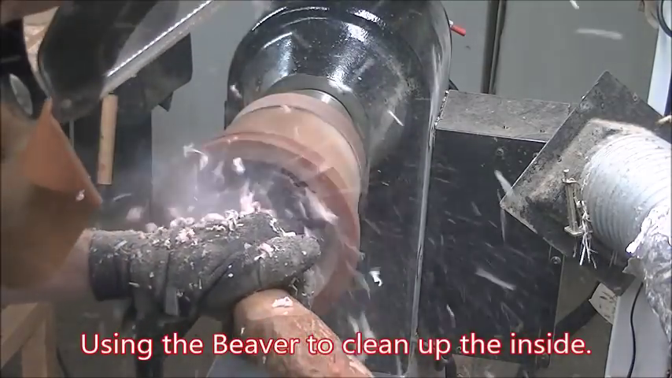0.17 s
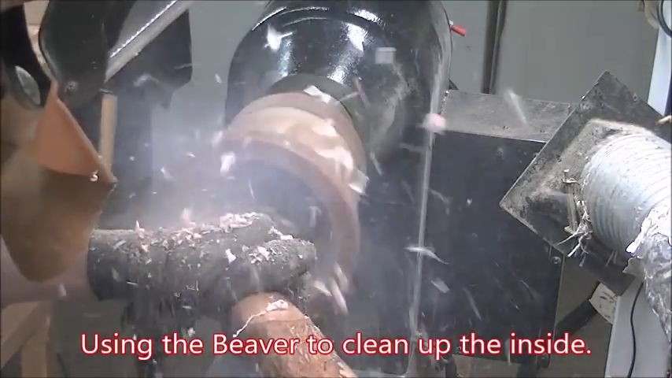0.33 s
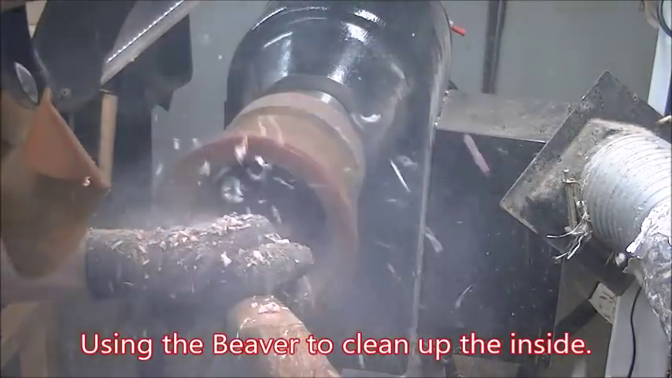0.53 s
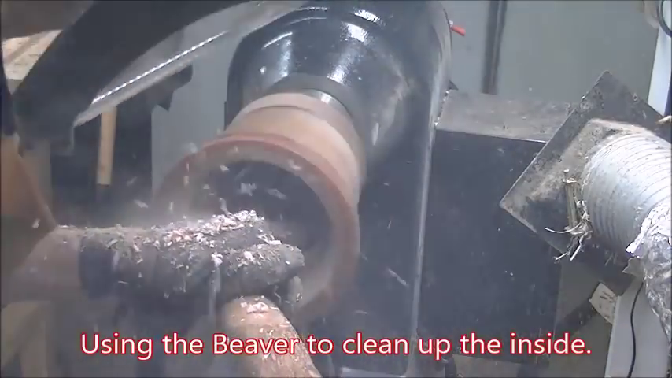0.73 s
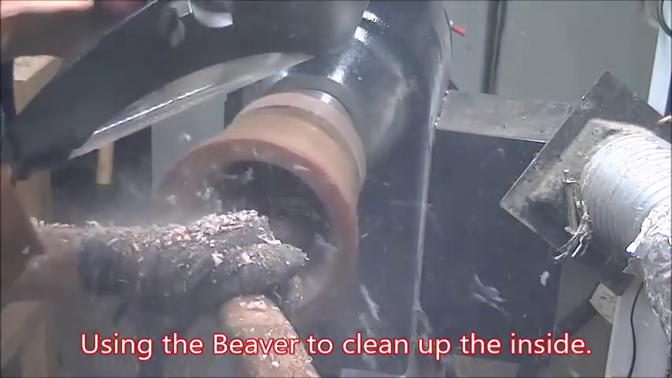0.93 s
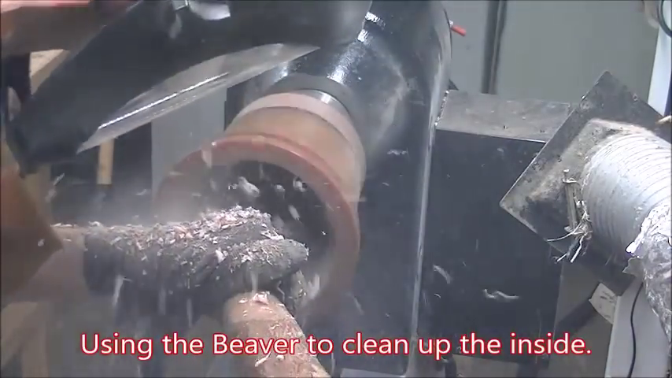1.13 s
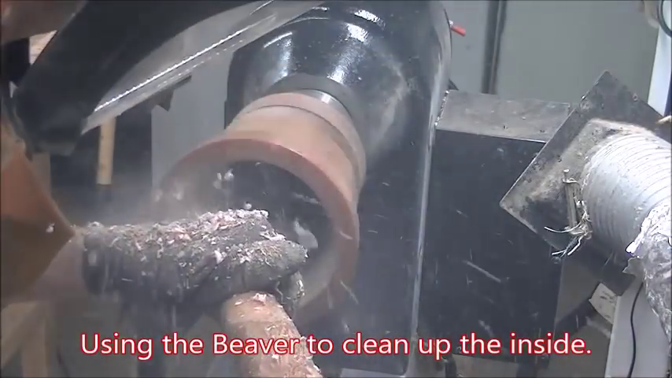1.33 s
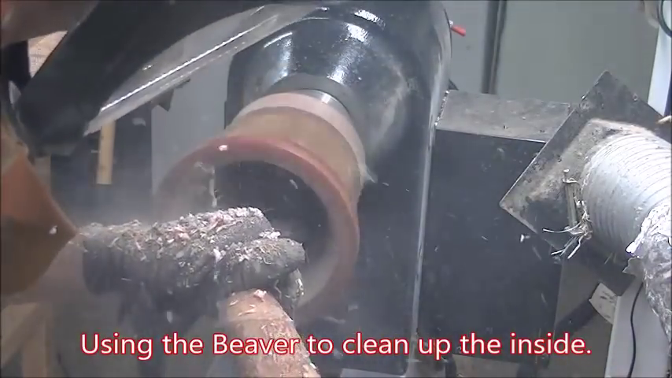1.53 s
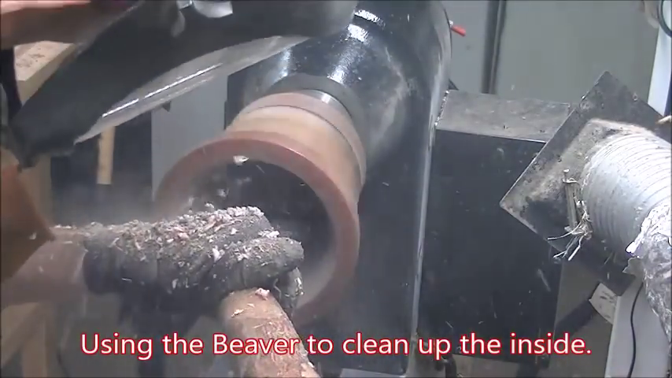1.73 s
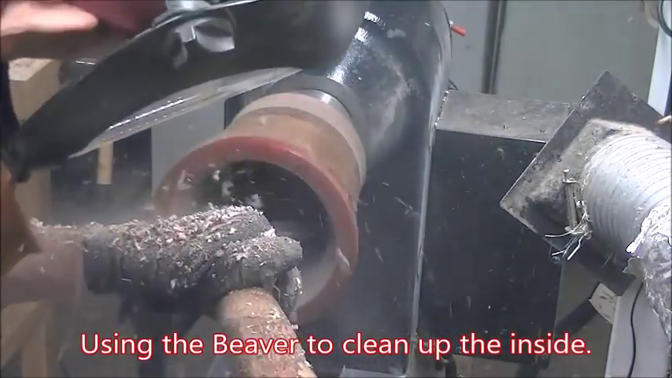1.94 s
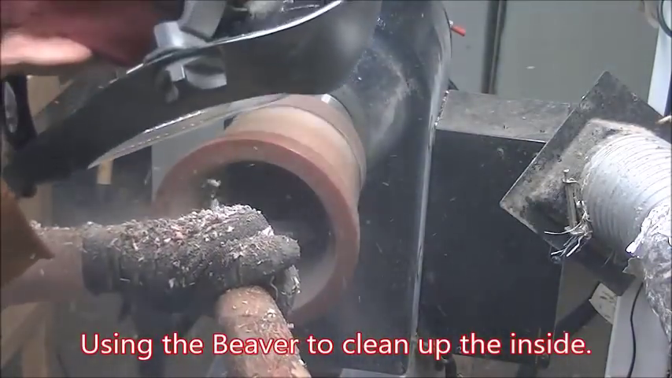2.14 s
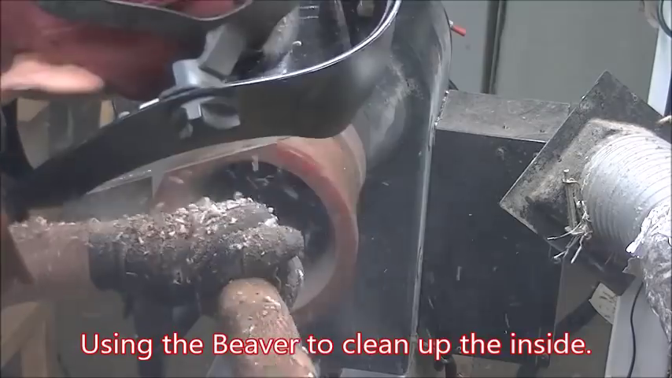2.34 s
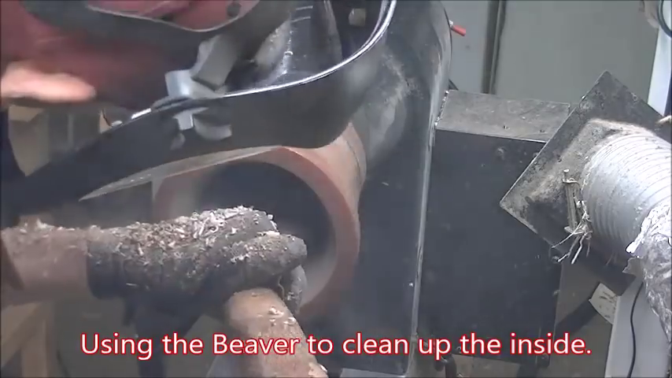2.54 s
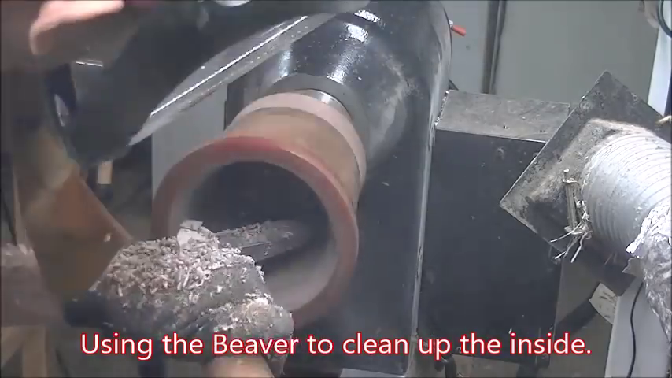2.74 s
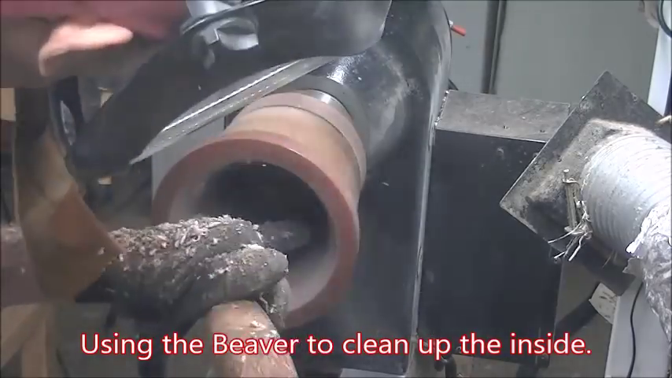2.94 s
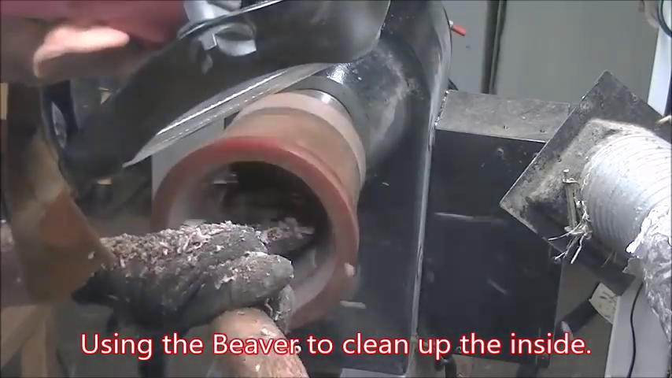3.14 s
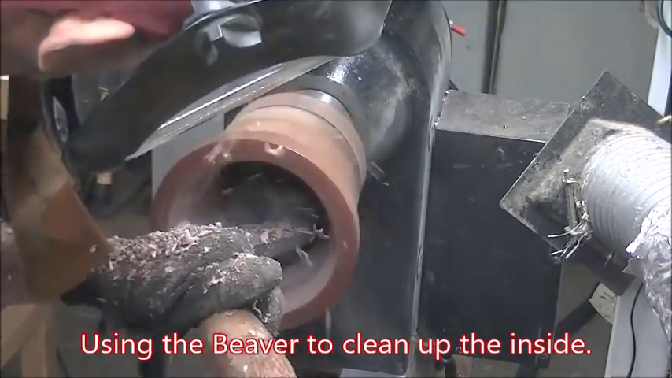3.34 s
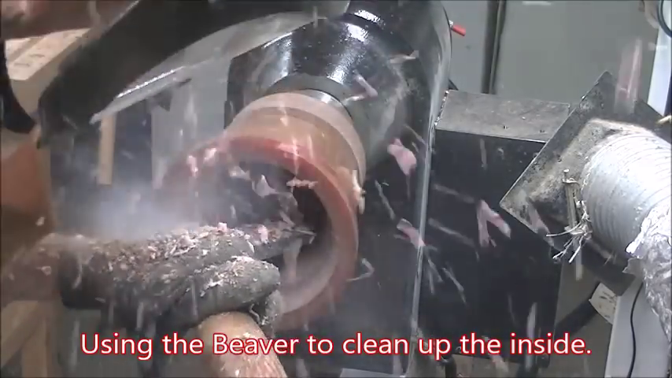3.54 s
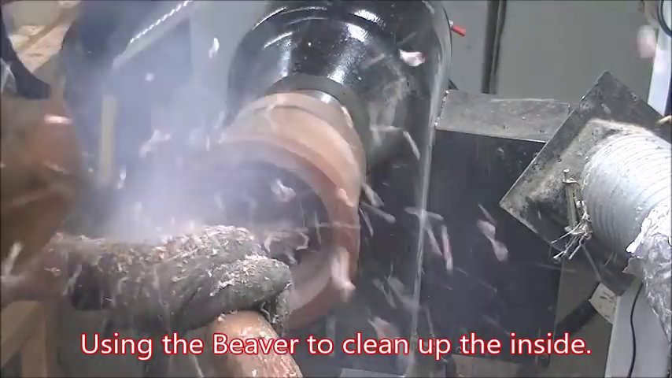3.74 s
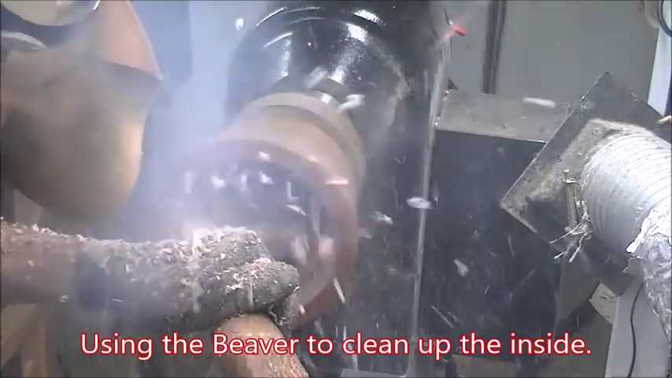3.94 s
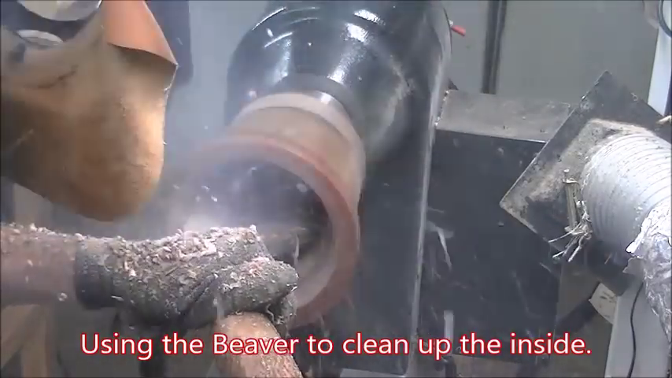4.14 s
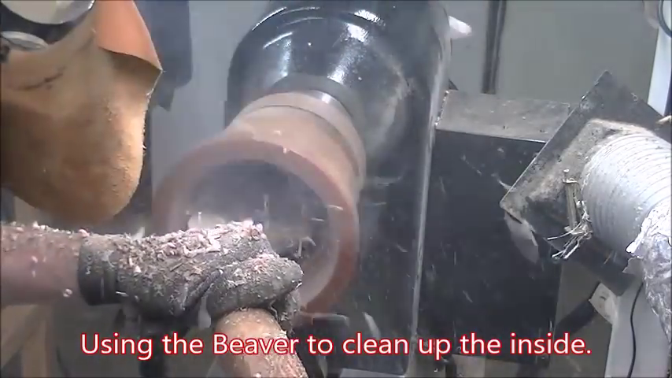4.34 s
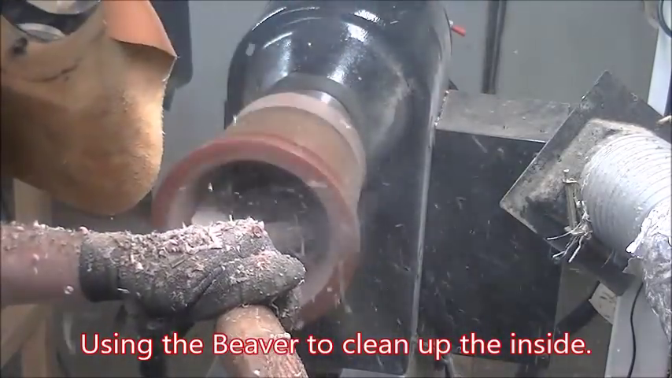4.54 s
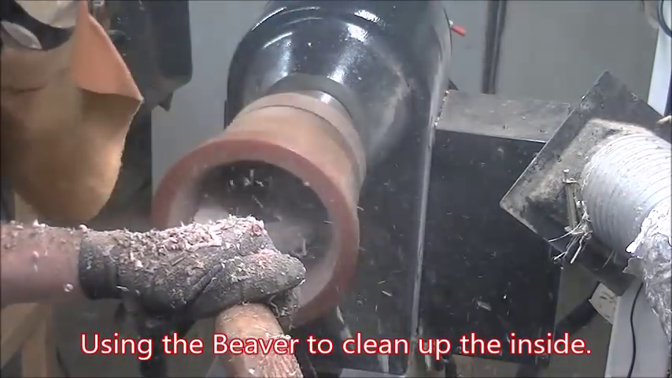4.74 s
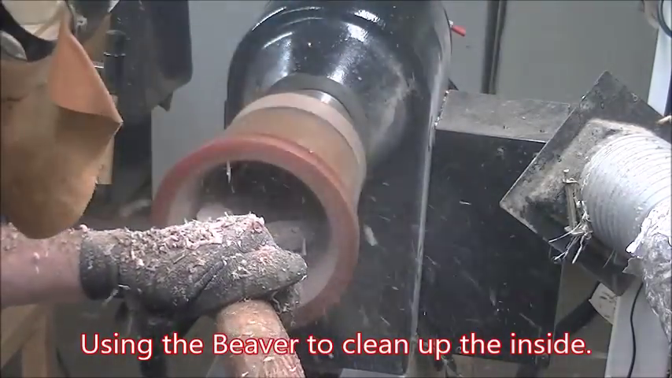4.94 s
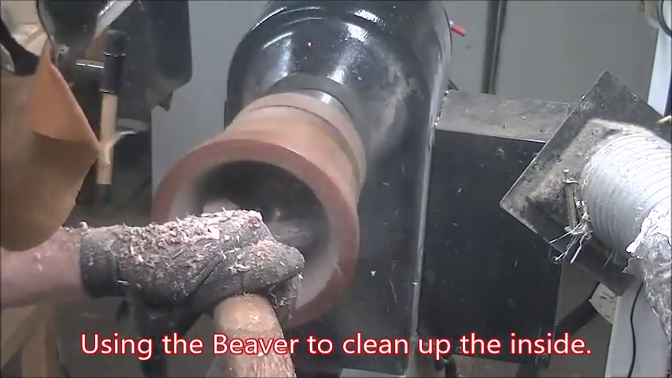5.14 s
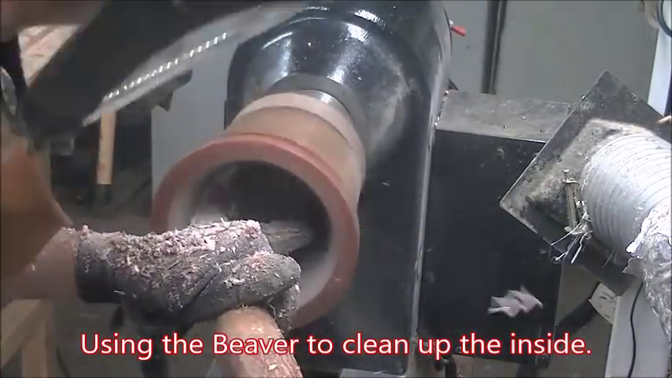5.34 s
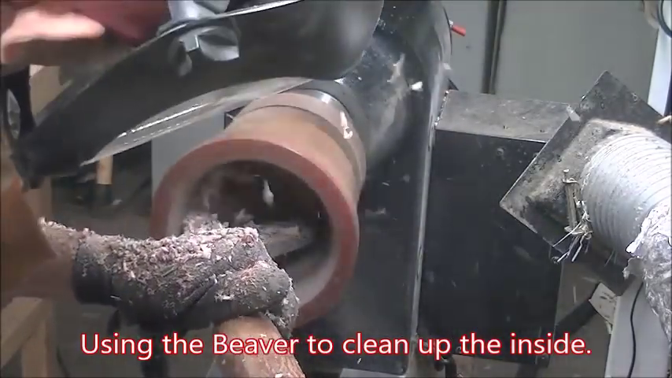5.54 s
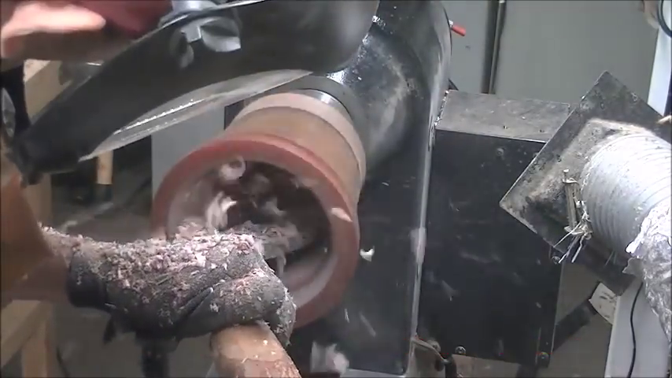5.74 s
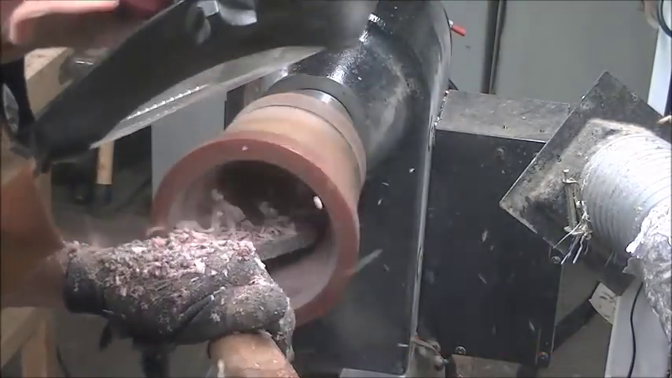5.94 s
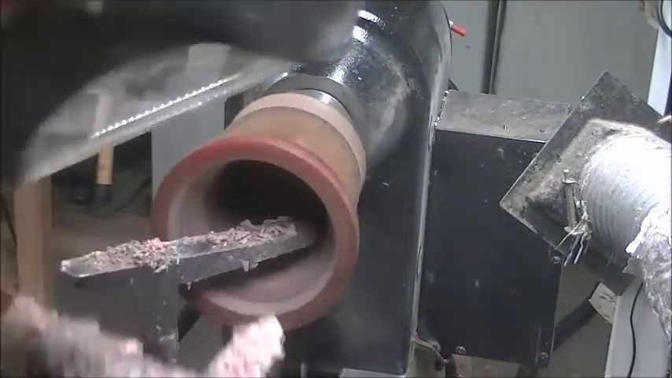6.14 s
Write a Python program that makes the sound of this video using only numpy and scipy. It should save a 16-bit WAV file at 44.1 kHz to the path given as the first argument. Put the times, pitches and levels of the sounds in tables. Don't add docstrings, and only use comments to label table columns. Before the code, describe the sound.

A hand-held tool scrapes loudly inside a spinning wooden bowl, hissing, ringing and squealing, with sharp ticks in two short pauses, over faint workshop machinery.

```python
import sys
import numpy as np
from scipy import signal
from scipy.fft import rfft, irfft, next_fast_len
from scipy.io import wavfile
from scipy.ndimage import uniform_filter1d, map_coordinates

SR = 44100
rng = np.random.default_rng(int(sys.argv[2]) if len(sys.argv) > 2 else 0)


def ratio(d):
    e = np.asarray(d, float) / 20
    return 10 ** e


def dump_mix(stems):
    frames = np.atleast_2d(stems).T
    limited = np.clip(frames, -1, 1)
    pcm = np.round(limited * 32767).astype(np.int16)
    wavfile.write(sys.argv[1], SR, pcm)


N = 273420
FRAME, OVERLAP = 1024, 768

# t/s, turns per second/Hz
SPIN = [(0, 66.5), (.4, 66.8), (.6, 67.13), (2.4, 67.2), (2.7, 68.2), (2.95, 67.4), (3.03, 66.8),
        (3.25, 66.8), (3.33, 67.4), (3.6, 67.3), (3.8, 67.05), (4.2, 67.15), (4.5, 67.4), (5.4, 67.4),
        (5.55, 66.5), (5.95, 66.35), (6.1, 67.8), (6.2, 68)]
# f/Hz, level/dB
SHAVING = [(2240, -31), (3800, -15.5), (4110, -15), (4500, -12), (5980, -2), (6660, -4), (7730, -3.5),
           (9020, -4.5), (10700, -6), (11600, -7.5), (13200, -7.5), (14500, -9.5), (15800, -5.5)]
# f/Hz, level/dB
WALL = [(1060, -29), (1800, -3.5), (1990, -2.5), (2360, -4.5), (2880, -1), (3560, -1.5), (4200, -4),
        (5460, -20), (9240, -120)]
# f/Hz, width/Hz, level/dB, extra at full overhang/dB
STEEL = [(5310, 130, -16, 13), (5520, 130, -14, 13), (5770, 150, -9, 12), (6100, 170, 0, -1),
         (6790, 110, -10, 0), (7070, 120, -8, -2), (7600, 200, -12, 2), (8350, 160, -10, 3),
         (9400, 200, -8, 2)]
# f/Hz, width/Hz, level/dB
RIM = [(1140, 60, -9), (1345, 90, -4), (1610, 50, 1), (1710, 120, -3)]
# t/s, length/s, gain/dB
HUMS = [
    (.22, 0.044, 8),
    (.56, .05, 8),
    (1.02, 0.66, 8.5),
    (1.84, .56, 8),
    (3.9, 0.047, 7),
    (4.78, .07, 6),
    (4.33, 0.36, 4),
    (4.93, 0.26, 9.5),
]
# t/s, length/s, gain/dB
FLICKERS = [(.18, .14, 4), (.52, .38, 5), (.94, .06, 5), (1.05, .13, 5), (1.26, .09, 6), (1.41, .07, 6),
            (1.51, .19, 5), (1.71, .19, 5), (1.96, .4, 4), (3.71, .35, 4), (4.12, .18, 4), (4.45, .3, 3),
            (4.93, .22, 4), (5.36, .2, 3)]


def cutting():
    turns = np.cumsum(curves(SPIN, np.arange(N) / SR)[0]) / SR
    tear, push = teeth(turns)
    f, t, _ = signal.stft(tear, SR, nperseg=FRAME, noverlap=OVERLAP)
    f = f[:, None]
    hiss_db, shank_db, shank_hz, tip_db, tip_hz, cavity_db, rim_db, wall_db, squeal_db = handling(t)
    reach = curves(REACH, t)[0]
    steel_power = sum(ratio(db + more_db * reach) ** 2 * np.abs(mode(f, hz, width)) ** 2
                      for hz, width, db, more_db in STEEL)
    steel = np.sqrt(steel_power)
    rim = sum((-1) ** k * ratio(db) * mode(f, hz, width) for k, (hz, width, db) in enumerate(RIM))
    wall = ratio(along(WALL, f))
    chip_fizz = mode(f, 11450, 900) ** 2 + .7 * mode(f, 14100, 900) ** 2
    colour = echoes(f, t)
    edge = shaped(tear, [(hiss_db + 4.5, ratio(along(SHAVING, f))),
                         (hiss_db + shank_db + 0.5, mode(f, shank_hz, 850) ** 2 + 4.3 * steel),
                         (hiss_db + tip_db - 1.5, mode(f, tip_hz, 640) ** 2),
                         (hiss_db - 7, chip_fizz),
                         (wall_db - 1.0, wall),
                         (squeal_db[1] - 1, mode(f, 3568, 290) ** 2)], colour)
    hum = shaped(push, [(cavity_db - 1.5, mode(f, 868, 75) ** 3),
                        (rim_db - 15.5 + spells(HUMS, t)[0], mode(f, 1076, 26) ** 2),
                        (rim_db - 6 + spells(FLICKERS, t)[0], rim * mode(f, 1390, 960)),
                        (wall_db - 6.0, wall),
                        (squeal_db[0] - 8, mode(f, 3535, 60) ** 3)], colour)
    return edge + hum + chatter(turns)


WANDER_TURNS = .0008
LATHE_HZ = 11.2
# t/s, repeating share/0-1, tooth unevenness/dB
BITE = [(0, 0.23, 2), (.6, 0.7, -1.5), (1.2, 0.33, 0.5), (1.8, 0.64, 3), (2.4, 0.4, 1), (3, 0.2, 2),
        (3.6, 0.07, 2), (4.1, 0.24, 0.5), (4.7, 0.52, 1.5), (5.2, 0.15, 1), (5.6, 0.58, 3), (6, 0, 4)]


def teeth(turns):
    t = np.arange(N) / SR
    share, uneven_db = curves(BITE, t)
    share = np.clip(share, 0, 1)
    grain = per_turn(turns + WANDER_TURNS * wobble(30), memory=.88, smooth=1)
    tear = np.sqrt(share) * grain + np.sqrt(1 - share) * rng.standard_normal(N)
    bunch = np.clip(uneven_db, 0, 9) * per_turn(turns, memory=0.876, smooth=71)
    rock = (0.22 + 0.59 * wobble(2.0)) * np.sin(2 * np.pi * LATHE_HZ * t)
    proud = 2.6 * np.cos(np.pi * turns) ** 12
    splinters = 1.42 * wobble(1500) + 0.53 * wobble(16)
    tear = tear * ratio(bunch + proud + splinters + rock)
    tear = tear / np.sqrt(np.abs(uniform_filter1d(tear ** 2, size=9000)))

    push = sum(ratio(2.4 * drift(7)) * np.sin(2 * np.pi * (k * turns + rng.random() + .07 * drift(12)))
               for k in range(11, 57))
    push = unit(push) + 1.5 * rng.standard_normal(N)
    return tear, push / 2.224


def per_turn(turns, memory, smooth):
    size, finer = 656, 4
    last = int(turns[-1])
    fresh = rng.standard_normal((last + 30, size))
    fresh = uniform_filter1d(fresh, smooth, axis=1, mode="wrap")
    ring = signal.lfilter([1], [1, -memory], fresh, axis=0)[-last - 2:].ravel()
    fine = signal.resample_poly(ring, up=finer, down=1)
    return unit(np.interp(turns * size * finer, np.arange(len(fine)), fine))


# t/s, hiss level/dB
PRESSURE = [(0, -24.5), (.06, -27), (.14, -22.5), (2.38, -22.5), (2.49, -29), (2.62, -37), (2.92, -46),
            (3.01, -24), (3.25, -28), (3.28, -32.5), (3.48, -22), (4.3, -23), (5.13, -23), (5.22, -28),
            (5.44, -23), (5.97, -26), (6.04, -40.5), (6.2, -43)]
# t/s, length/s, gain/dB
LEANS = [(.08, .04, 1), (1.44, 0.049, 1), (1.8, 0.025, -2), (2.76, 0.099, -4.5), (3.12, .04, -1.5),
         (3.255, 0.068, -2.5), (2.42, 0.067, 0), (2.58, 0.096, -1), (3.0, 0.011, -1), (3.33, 0.096, 0.5),
         (3.44, 0.073, -1.5), (4.12, 0.14, -0.5), (5.135, .05, 1), (5.96, 0.037, 2)]
# t/s, overhang/0 short to 1 long, freedom to ring/dB
REACH = [(0, 0.052, -1.5), (.35, 0.15, -1.5), (.7, 0.2, -1), (1.3, 0.48, 2.5), (2.0, 0.63, 1.5),
         (2.4, 0.84, -3.5), (2.92, 0.53, -1.5), (3.0, 0.11, -2.5), (3.9, 0.22, 0.5), (4.4, 0.53, 0),
         (5.1, 0.99, 1), (5.2, 0.43, -3.5), (5.38, 1, 1.5), (5.5, 0.49, 3.5), (5.95, 0.031, -1.5),
         (6.08, 0.69, -5)]
# t/s, length/s, cavity/dB, rim/dB, wall/dB
RUBS = [(-.05, 0.34, 6, 2, 1.5), (.34, 0.078, -9.5, 2.5, 0.5), (.715, 0.062, -22.5, -1.5, 1.5),
        (1.755, .015, -16, 0, 1), (2.24, .03, -13, -0.5, 0.5), (1.5, .15, 2, 0, 0),
        (1.435, 0.017, -17, -1, 1), (1.67, 0.014, -11, -8, -4), (3.635, 0.033, -22, -1, -1.5),
        (3.72, 0.029, -22, 0, 1), (3.795, 0.039, -18.5, 3, 2.5), (5.19, 0.05, -25, 4.5, -5),
        (5.575, 0.023, -14, 1, 4.5), (5.805, 0.021, 3, -14, 5.5), (2.05, 0.25, -1, -1.5, -1.5),
        (2.3, 0.09, 2, -2, 1.5), (2.38, 0.091, -1.5, 1.5, 6), (2.98, 0.15, 10.5, 7, 1),
        (3.13, 0.16, 15, 10.5, 4.5), (3.3, 0.15, 12, 1, 0), (3.43, 0.29, 0, -4.5, 0),
        (3.58, 0.2, -3.5, 3.5, 2.5), (4.1, 0.84, 3, 1, 0), (5.04, 0.053, -20, 2.5, 2.5),
        (5.1, 0.23, 3, 1, 4), (5.28, 0.2, 3, 5, 0.5), (3.84, 0.27, 3, 1.5, 0.5), (4.3, 0.3, 1.5, 0, 1),
        (4.75, 0.19, 4, -1, 1), (5.5, 0.3, 9, 7, 4), (5.82, 0.21, 13.5, 5.5, 2.5)]
# t/s, length/s, tone/dB, hoarse/dB
SQUEALS = [(.04, .12, 0, 5), (.22, .24, 4, 1), (.78, .17, 7, 2), (1.05, .3, 9, 3), (1.45, .63, 10, 4),
           (2.52, 0.06, 20, 14), (2.6, .1, 12, 8), (2.98, 0.21, 10, 3), (3.062, .07, 5, 0),
           (3.2, .06, 6, 6), (3.35, .06, 6, 8), (3.45, 0.55, 4, 9.5), (5.54, 0.16, 3, 8), (5.75, .2, 0, 2),
           (5.12, .22, -4, -6)]


def handling(t):
    def sway(rate):
        knots = 100
        return np.interp(t * rate, np.arange(knots), rng.standard_normal(knots))

    hiss_db = curves(PRESSURE, t)[0] + spells(LEANS, t)[0]
    reach, free_db = curves(REACH, t)
    shank_db = -2.5 + 5 * reach + free_db + 0.6 * sway(12)
    shank_hz = 6195 - 434 * reach + 30 * sway(8.1)
    tip_db = 4.5 - 8.5 * reach + free_db + 0.84 * sway(9)
    tip_hz = 9130 - 50 * reach - 108 * t + 70 * sway(8.8)
    wood_db = 0.33 * (hiss_db - np.median(hiss_db))
    hollow_db, lip_db, thick_db = spells(RUBS, t)
    cavity_db = -41 + 1.84 * wood_db + hollow_db + 1.8 * sway(15)
    rim_db = -40.5 + 2.5 * (reach - .6) + 0.26 * wood_db + lip_db + 1.1 * sway(9)
    wall_db = -32.5 + wood_db + thick_db + 1.2 * sway(8)
    squeal_db = hiss_db - 14.5 - 9 * reach + spells(SQUEALS, t) + 1.5 * sway(11)
    return hiss_db, shank_db, shank_hz, tip_db, tip_hz, cavity_db, rim_db, wall_db, squeal_db


# t/s, length/s, f/Hz, width/Hz, gain/dB
ECHOES = [(0, 1.4, 8530, 200, -7.5), (0.4, 2.7, 6320, 140, -7), (-0.7, 1.2, 7900, 120, -3),
          (1, 1.7, 9290, 121, -8), (1.5, 3.1, 10700, 350, -3), (-.1, 1.6, 13300, 1000, -2),
          (0.1, 2.1, 4000, 200, -5), (0.2, 1.6, 4460, 120, -4.5), (-0.16, 0.65, 3930, 440, 4.5),
          (2, 0.074, 4320, 2000, 5), (0.4, 0.27, 6050, 430, 4), (1.12, 1.3, 5830, 270, -6),
          (0.3, 0.47, 5450, 250, 2.5), (2.5, 0.22, 5700, 680, 5.5), (5, .64, 5910, 700, 5),
          (5.5, 0.174, 5750, 600, -4), (3.5, 0.38, 6100, 400, 2), (2.5, 0.17, 4150, 570, 4),
          (3, 0.1304, 1700, 470, -6), (5.5, .55, 8200, 696, 2.5), (-0.3, 1, 2270, 290, -1.5),
          (.9, 1.5, 3220, 120, -5.5), (3, 0.23, 1760, 400, 7), (2.5, 0.63, 6210, 305, 4.5),
          (4, 1.3, 4200, 160, -1), (4, 0.49, 1670, 100, 7), (3.5, 1, 11150, 257, -13.5),
          (4, 1, 12650, 620, 5), (1.5, 1.8, 13500, 800, -5.5), (-0.5, 3.1, 7740, 257, -0.5),
          (2, 0.81, 4000, 250, -0.5), (3.85, 0.84, 9300, 200, -1), (4, 1.05, 4030, 220, -6.5),
          (4, 1.5, 6000, 180, -3.5), (5, 1.9, 9700, 270, -5.5), (5.5, 0.069, 4960, 1510, 6),
          (3, 0.22, 4040, 160, -19), (5.5, 0.63, 12500, 540, 7), (4.5, 0.59, 11000, 650, -7),
          (2.5, 0.37, 8200, 250, -8)]


def echoes(f, t):
    gain_db = 0
    for s, length, hz, width, db in ECHOES:
        hump = db / (1 + (2 * (f - hz) / width) ** 2)
        gain_db = gain_db + hump * spells([(s, length, 1)], t)
    return ratio(gain_db)


# t/s, level/dB
CHATTER = [
    (0, -94),
    (5.46, -79),
    (5.56, -30.5),
    (5.8, -36.5),
    (5.9, -51),
    (5.97, -83.5),
    (6.2, -61),
]


def chatter(turns):
    level_db = curves(CHATTER, np.arange(N) / SR)[0] + 3.0 * wobble(27)
    ripples = 18
    bounce = sum(ratio(db) * np.sin(2 * np.pi * k * ripples * turns) for k, db in enumerate([-.5, 2.5, 1.5], 1))
    return ratio(level_db - 3.0) * bounce


# t/s, length/s, f/Hz, level/dB
SONGS = [(0.24, 0.36, 3546.0, -37.0), (0.54, 0.08, 8997, -30), (0.58, 0.28, 5374.0, -36.0),
         (0.72, 0.24, 3550, -40), (0.8, 0.16, 6097, -34), (0.96, 0.58, 2412.0, -47.0),
         (1.02, 0.16, 8978.0, -31.0), (1.06, 0.48, 3553.0, -38.0), (1.42, 0.46, 5506.0, -33.0),
         (1.56, 0.76, 3495.0, -39.0), (1.6, 0.16, 6052.0, -33.0), (1.6, 0.32, 5245.0, -36.0),
         (1.66, 0.42, 3557.0, -39.0), (1.78, 0.24, 6107.0, -31.0), (1.8, 0.52, 5311.0, -33.0),
         (1.92, 0.14, 8865.0, -30.0), (2.02, 0.3, 6791.0, -40.0), (2.08, 0.26, 5246.0, -37.0),
         (2.1, 0.18, 5522.0, -34.0), (2.1, 0.22, 6124.0, -31.0), (2.12, 0.14, 5588.0, -31.0),
         (2.12, 0.16, 8818.0, -33.0), (3.02, 0.16, 3540.0, -27.0), (3.02, 0.22, 3489.0, -34.0),
         (3.12, 0.16, 1604, -37), (3.96, 0.8, 1346.0, -54.0), (4.04, 0.66, 2690.0, -44.0),
         (4.34, 0.36, 2153.0, -43.0), (4.42, 0.66, 1614.0, -46.0), (4.48, 0.36, 6468.0, -36.0),
         (4.5, 0.44, 2422.0, -43.0), (4.52, 0.3, 3435.0, -40.0), (4.62, 0.42, 3101.0, -42.0),
         (4.74, 0.14, 5527.0, -31.0), (4.82, 0.12, 5795.0, -28.0), (4.82, 0.22, 6064.0, -28.0),
         (5.04, 0.06, 5728, -25), (5.32, 0.16, 5744.0, -30.0), (5.34, 0.2, 8236.0, -32.0),
         (5.36, 0.42, 6058.0, -32.0), (5.38, 0.12, 8098.0, -31.0), (5.44, 0.14, 6136.0, -30.0),
         (5.6, 0.38, 1724.0, -42.0)]
# t/s, length/s, f/Hz, level/dB
CATCH = [
    (3.065, .065, 3540, -28),
    (3.02, .06, 3489, -30),
    (2.99, .03, 3540, -33),
    (3.235, .025, 3440, -30),
]


def songs():
    out = np.zeros(N)
    sway_db, blur_cycles = 2.2 * wobble(22), .09 * wobble(18)
    for s, length, hz, db in list(SONGS) + list(CATCH):
        ease = min(.03, length / 2)
        n = np.arange(round((s - ease) * SR), round((s + length + ease) * SR))
        own = (n + int(hz) * 40) % N
        hold = np.clip(np.minimum(n - n[0], n[-1] - n) / (2 * ease * SR), 0, 1)
        tone = np.sin(2 * np.pi * (hz * n / SR + blur_cycles[own]))
        out[n] += np.sqrt(2) * hold * ratio(db - 1.5 + sway_db[own]) * tone
    return out


# t/s, peak level/dB, wood level/dB, time to fade by 60 dB/s
TICKS = [(2.302, -6.5, -23.5, .008), (2.348, -9.5, -24, 0.0048), (2.3567, -5, -24, .006),
         (2.3703, -5.5, -21, 0.0054), (2.377, -4, -24, 0.006), (2.381, -4, -33, 0.0056),
         (2.398, -8, -22, 0.005), (2.4632, -8, -29.5, 0.0075), (2.4698, -3, -24, 0.006),
         (2.554, -8.5, -22, 0.0086), (2.5578, 0, -36, 0.0092), (2.706, -14.5, 7, 0.03),
         (2.943, -16.5, -5, 0.021), (5.134, -2.5, -31, 0.0069), (5.1935, -4, -17, 0.016),
         (5.222, -10, -22, 0.025)]
# f/Hz, width/Hz, level/dB
TAP = [(5646, 190, 5), (7570, 270, -1.5), (8600, 650, -4.5), (12900, 1900, -19)]


def ticks():
    out, t = np.zeros(N + SR), np.arange(SR // 10) / SR
    f = np.fft.rfftfreq(len(t), 1 / SR)
    steel = sum((-1) ** k * ratio(db) * mode(f, hz, width) for k, (hz, width, db) in enumerate(TAP))
    wood = mode(f, 2540, 900)
    for s, db, wood_db, t60 in TICKS:
        burst = rng.standard_normal(len(t)) * ratio(-60 * t / t60) * (1 - np.exp(-t / 0.00066))
        ring = irfft(rfft(burst) * (steel + ratio(wood_db + 6.0) * wood), len(t))
        out[round(s * SR):][:len(t)] += ratio(db) * ring / np.abs(ring).max()
    return out[:N]


# t/s, peak level/dB, time to fade by 60 dB/s
SPITS = [
    (2.942, -8, .04),
    (3.03, -7, .008),
    (3.18, 2, .008),
    (3.328, -9, 0.019),
    (3.358, -6, 0.026),
]


def spits():
    out, t = np.zeros(N), np.arange(SR // 20) / SR
    for s, db, t60 in SPITS:
        fade = ratio(db - 6.5 - 60 * t / t60) * (1 - np.exp(-t / 0.0013))
        out[round(s * SR):][:len(t)] += fade * rng.standard_normal(len(t))
    return filtered(out, lambda f: 1.67 * mode(f, 10200, 7100) ** 2)


# f/Hz, level/dB
AIR = [(330, -73), (620, -10), (939, -6.5), (1470, -10), (1710, -9.5), (1860, -0.5), (2950, -10),
       (3210, -2), (3640, -2), (4370, -8), (5240, 0.5), (5700, -3), (15800, -9.5)]
# f/Hz, level/dB
WHINE = [(958, -56), (1437, -52), (1906, -41.5), (3252, -52), (5728, -53)]


def machines(duck):
    hiss = unit(filtered(rng.standard_normal(N), lambda f: ratio(along(AIR, f))))
    air = ratio(-32 + 2.0 * wobble(7.4)) * hiss
    clock = np.cumsum(1 + .0012 * wobble(25)) / SR
    tones = sum(ratio(db + 4.5 + 1.8 * wobble(27)) * np.sin(2 * np.pi * (hz * clock + rng.random()))
                for hz, db in WHINE)
    whine_ducks = 1.6
    return air * duck + tones * duck ** (2 * whine_ducks)


# f/Hz, time to fade by 60 dB/s
SHOP = [(700, 0.22), (3000, 0.48), (12000, 0.14)]


def shop(x):
    hz, t, z = signal.stft(rng.standard_normal((2, SR // 2)), SR, nperseg=256)
    fade = ratio(-60 * t / along(SHOP, hz)[:, None])
    tail = signal.istft(z * fade, SR, nperseg=256)[1]
    return signal.fftconvolve(x[None], tail / np.linalg.norm(tail[0]), axes=1)[:, :N]


def shaped(force, parts, colour):
    z = signal.stft(force, SR, nperseg=FRAME, noverlap=OVERLAP)[2]
    power = sum(ratio(db) ** 2 * np.abs(unit(shape)) ** 2 for db, shape in parts)
    phase = sum(ratio(db) * unit(shape) for db, shape in parts)
    gain = colour * np.sqrt(power) * phase / (np.abs(phase) + 1e-12)
    return signal.istft(z * gain, SR, nperseg=FRAME, noverlap=OVERLAP)[1][:N]


def spells(rows, t):
    ease_s = 0.011
    s, length, *gains = np.transpose(rows)
    inside = np.minimum(t - s[:, None], (s + length)[:, None] - t) / ease_s + .5
    return np.array(gains) @ np.clip(inside, 0, 1)


def mode(f, hz, width_hz):
    return 1j * f * width_hz / (hz * hz - f * f + 1j * f * width_hz + 1e-9)


def filtered(x, response):
    m = next_fast_len(N + SR // 2)
    return irfft(rfft(x, m) * response(np.fft.rfftfreq(m, 1 / SR)), m)[..., :N]


def unit(x):
    return x / np.sqrt(np.mean(np.abs(x) ** 2, axis=0) + 1e-20)


def along(points, hz):
    f, v = np.transpose(points)
    return np.interp(np.log(hz + 1), np.log(f + 1), v)


def curves(rows, t):
    s, *cols = np.transpose(rows)
    return [np.interp(t, s, c) for c in cols]


def wobble(rate):
    knots = rng.standard_normal(int(N * rate / SR) + 4)
    return map_coordinates(knots, [np.arange(N) * rate / SR])


def drift(rate):
    knots = rng.standard_normal(int(N * rate / SR) + 4)
    return np.interp(np.arange(N) * rate / SR, np.arange(len(knots)), knots)


# f/Hz, level/dB
SIDEWAYS = [(60, -2), (110, 4), (200, -3), (380, -22), (700, -15.5), (1290, -24.5), (2380, -27),
            (4400, -30), (8120, -20.5), (15000, -12.5)]


def scene():
    tool = cutting() + ticks() + spits() + songs()
    loud = np.abs(uniform_filter1d(tool ** 2, size=6000))
    dry = tool + machines(1 / np.sqrt(1 + loud / ratio(-18.5) ** 2))
    common, apart = shop(dry)
    mid = dry + ratio(-14) * common
    spread = filtered(apart, lambda f: ratio(along(SIDEWAYS, f) + 6.0))
    side = np.tanh(2 * wobble(8.4)) * spread + 0.031 * mid
    return np.array([mid + side, mid - side])


# f/Hz, level/dB
WEAKEST_MID = [(600, -30), (710, -29.5), (800, -34.5), (880, -38), (980, -33.5), (1080, -33.5),
               (1140, -33.5), (1230, -30), (1350, -32.5), (1500, -31.5), (1700, -35), (2300, -30.5),
               (4100, -32.5), (8000, -31.5), (13000, -41)]
# f/Hz, level/dB
WEAKEST_SIDE = [(700, -54), (1200, -50), (4000, -45), (6000, -38), (9000, -38), (12000, -38), (14000, -36),
                (16000, -36)]
SUDDEN = [.99, 1.89, 2.15, 2.47, 2.555, 2.94, 3.05, 3.25, 4.63, 6.05]


def weak_bands_muted(x):
    f, t, z = signal.stft([x[0] + x[1], x[0] - x[1]], SR, nperseg=FRAME, noverlap=OVERLAP)
    power = np.abs(z) ** 2
    whole = uniform_filter1d(power[0].sum(0), size=24)
    opening = np.abs(t - np.array(SUDDEN)[:, None]).min(0) < .012
    cols = np.arange(len(t)) // 4 * 4
    for part, strength, floor, width in zip(z, power, [WEAKEST_MID, WEAKEST_SIDE], [2, 8]):
        rows = np.arange(len(f)) // width * width
        band = uniform_filter1d(strength, size=width, axis=0, origin=-(width // 2))
        band = uniform_filter1d(band, size=4, axis=1, origin=-2)[rows][:, cols]
        strong = 2 * band > whole[cols] * ratio(along(floor, f))[:, None] ** 2
        part *= strong | opening * (f[:, None] > 1500)
    mid, side = signal.istft(z, SR, nperseg=FRAME, noverlap=OVERLAP)[1][:, :N] / 2
    return np.array([mid + side, mid - side])


def low_pass(x):
    return signal.sosfilt(signal.butter(12, 16920, fs=SR, output="sos"), x)


def record(dry):
    soft = dry / (1 + np.abs(dry / .9) ** 4) ** (1 / 4)
    x = filtered(soft, lambda f: (f < 15740) * (f > 560) / np.sqrt(1 + (560 / (f + 1)) ** 6))
    mix = weak_bands_muted(x)
    return low_pass(mix)


dry = scene()
out = record(dry)
dump_mix(out)
```